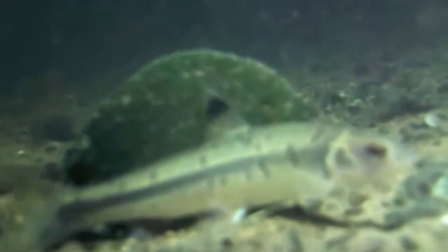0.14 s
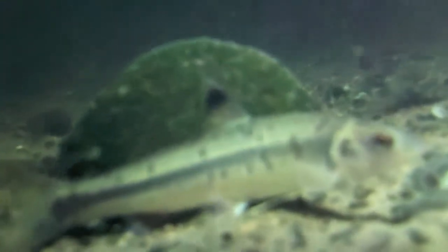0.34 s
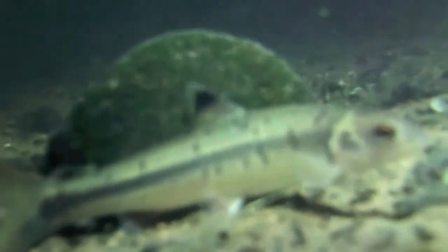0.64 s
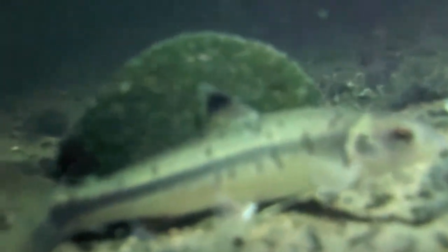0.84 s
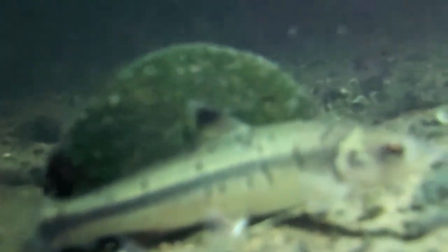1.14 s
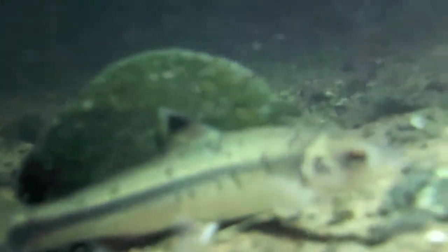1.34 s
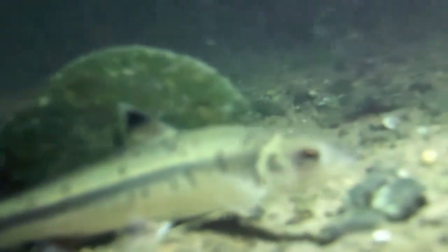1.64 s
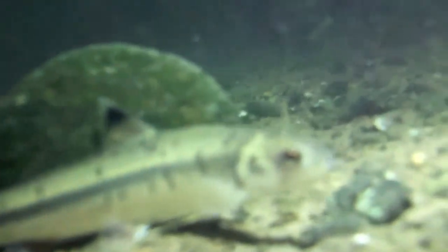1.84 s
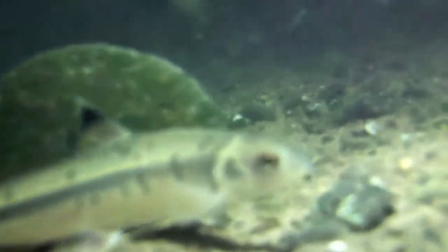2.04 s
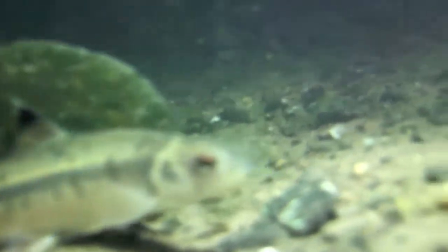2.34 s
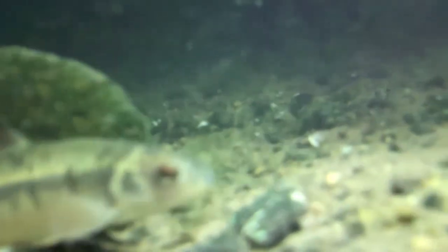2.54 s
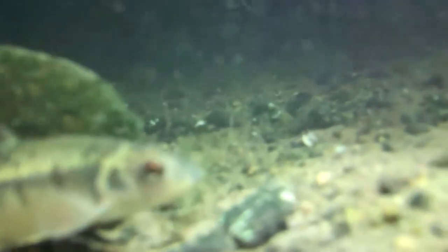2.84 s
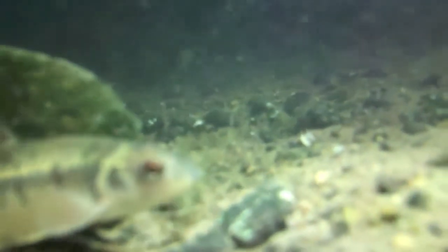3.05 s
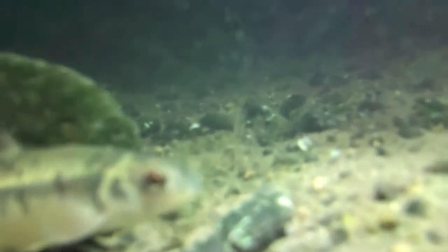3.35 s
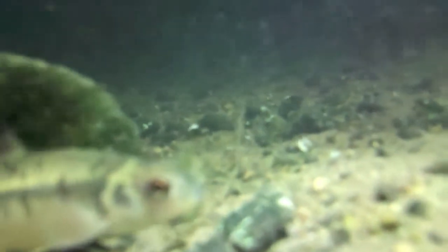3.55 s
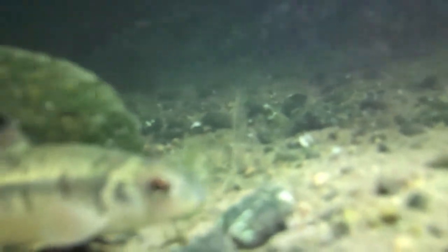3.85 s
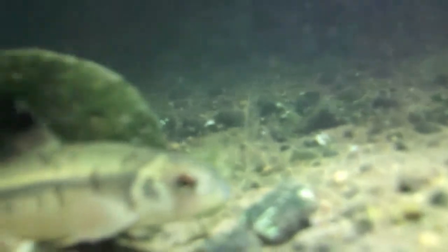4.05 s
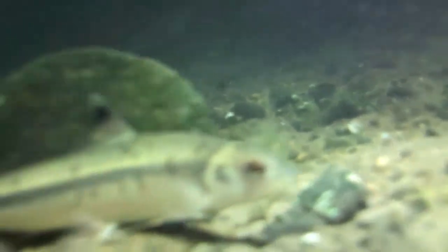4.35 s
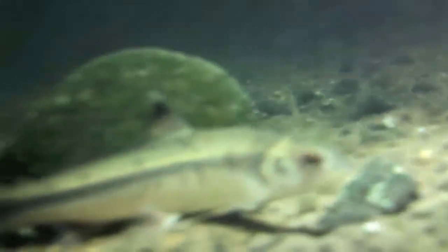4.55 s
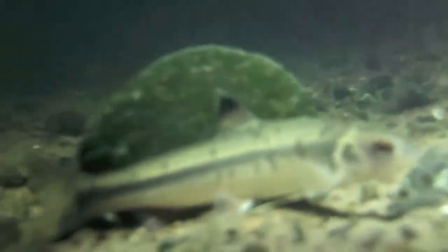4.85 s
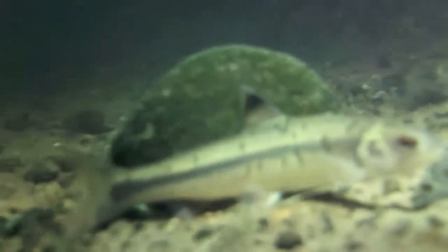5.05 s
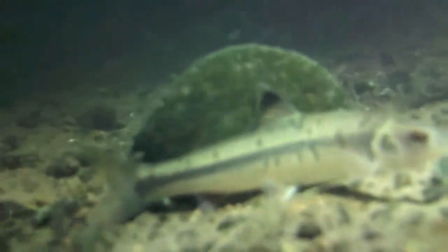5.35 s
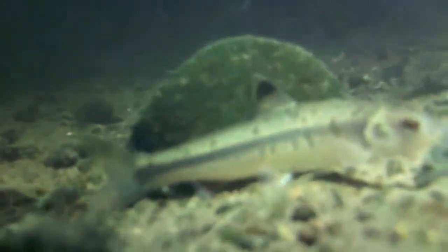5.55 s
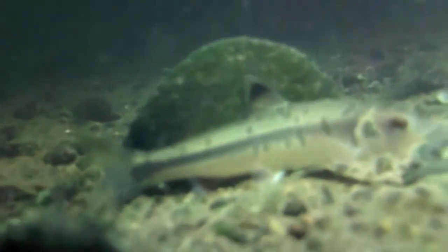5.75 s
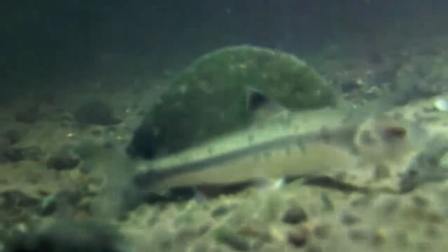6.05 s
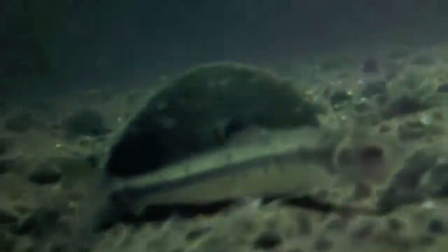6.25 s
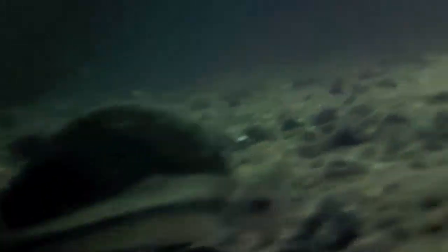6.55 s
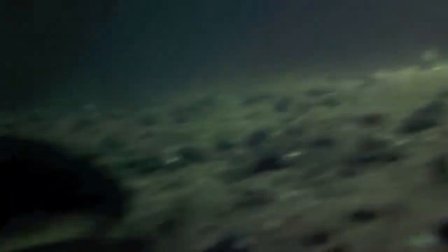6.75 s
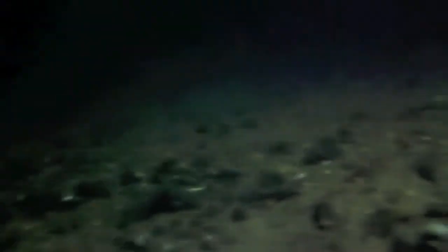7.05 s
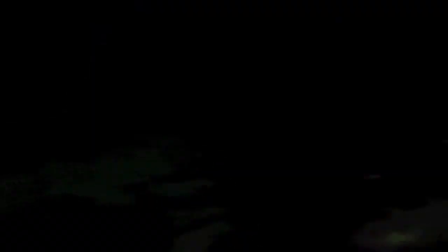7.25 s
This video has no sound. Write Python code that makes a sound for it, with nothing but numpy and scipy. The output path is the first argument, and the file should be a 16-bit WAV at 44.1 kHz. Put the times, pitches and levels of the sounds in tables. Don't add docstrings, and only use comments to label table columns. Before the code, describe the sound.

Heard from inside a sealed underwater housing, a canal current makes a low, lurching rumble. Muffled hollow knocks come often in the first two and a half seconds, thin out in the middle, then return more strongly from about six seconds to the end. Very faint hiss, a thin steady high whine and rare tiny ticks lie above.

```python
import sys
import numpy as np
from scipy import signal
from scipy.fft import rfft, irfft
from scipy.io import wavfile
from scipy.ndimage import uniform_filter1d, minimum_filter1d

SR = 44100
rng = np.random.default_rng(int(sys.argv[2]) if len(sys.argv) > 2 else 0)


def voltage_ratio(level):
    return 10 ** (np.asarray(level, float) / 20)


def to_wav(sig):
    pcm = np.clip(np.atleast_2d(sig), -1, 1) * 32767
    pcm = np.round(pcm).astype(np.int16)
    wavfile.write(sys.argv[1], SR, pcm.T)


N = 325899

# f/Hz, width/Hz, lowest f/Hz, highest f/Hz
ROCK_MODES = [
    (30.2, 29, 2, 46),
    (60.81, 4.9, 49.3, 140),
    (79.03, 12, 49, 110),
]
# t/s, level/dB
FLOW = [(0, -2), (.37, 2), (.75, -3), (1.3, 1.5), (1.7, -1), (2.3, 0.5), (2.6, 1), (3.6, 1.5), (4.2, 1),
        (4.8, 3), (5.4, 0.5), (5.95, 1), (6.25, -6.5), (6.7, 3.5), (7.1, 2.5), (7.39, 0)]
# t/s, peak level/dB, length/s
HEAVES = [(-0, -28, 0.028), (0.562, -44.5, 0.22), (1.029, -45, 0.11), (1.328, -42.5, 0.2),
          (1.586, -46.5, 0.075), (2.35, -45, 0.19), (3.76, -51, 0.19), (4.203, -47, 0.096),
          (4.66, -37.5, 0.18), (5.823, -46, 0.16), (6.524, -45, 0.056), (7.087, -39, 0.062),
          (7.266, -36, 0.099)]
# t/s, peak level/dB, length/s
SWAYS = [(0.059, -40, 0.071), (0.25, -43, 0.1), (0.519, -38, 0.38), (0.763, -40.5, 0.18),
         (1.058, -40.5, 0.2), (1.385, -37.5, 0.06), (1.501, -44, 0.053), (1.74, -45.5, 0.097),
         (1.922, -39.5, 0.14), (2.434, -42.5, 0.086), (2.992, -42.5, 0.063), (3.483, -50, 0.053),
         (3.879, -43, 0.19), (4.132, -36.5, 0.05), (4.31, -42, 0.084), (4.578, -39.5, 0.06),
         (4.703, -41.5, 0.16), (4.917, -39, 0.095), (5.13, -41.5, 0.22), (5.51, -42, 0.08),
         (5.762, -37.5, 0.044), (5.931, -38.0, 0.095), (6.03, -43, 0.047), (6.151, -36.5, 0.093),
         (6.513, -43.5, 0.16), (6.704, -34, 0.081), (6.823, -41.5, 0.08), (6.967, -38, 0.08),
         (7.11, -43.5, 0.046), (7.328, -45.5, 0.12)]
# t/s, peak level/dB, length/s
NODS = [(0.083, -39, 0.081), (0.238, -30, 0.06), (0.334, -33.5, 0.064), (0.502, -33.5, 0.041),
        (0.658, -36, 0.043), (0.739, -39.5, 0.059), (1.017, -36, 0.025), (1.06, -40.5, 0.089),
        (1.382, -40, 0.028), (1.489, -34.5, 0.031), (1.725, -33.5, 0.028), (1.865, -36, 0.03),
        (1.91, -35.5, 0.055), (2.175, -45, 0.066), (2.292, -35, 0.043), (2.383, -36.1, 0.035),
        (2.956, -40, 0.041), (3.478, -37, 0.033), (3.71, -41, 0.05), (4.562, -44.5, 0.037),
        (4.697, -35, 0.04), (4.871, -34, 0.15), (5.136, -35, 0.031), (5.901, -38, 0.035),
        (6.012, -29.5, 0.049), (6.176, -38, 0.023), (6.719, -37, 0.048), (6.81, -37.5, 0.033),
        (6.897, -42, 0.028), (7.287, -41, 0.031)]
CALM_DB = [-52, -56.5, -57.5]
CALM_FLOW = [.5, 0.61, 0.99]
CALM_RATE_HZ = [8.7, 8.1, 13]
CALM_SPREAD_DB = [2, 4.0, 4.5]
RISE_SHARE = 0.98

# f/Hz, level/dB, t60/s
SHELL = [(113.3, 1.5, 0.17), (200.4, -0.5, 0.059), (251, 0, 0.11), (330.4, -5.5, 0.082),
         (417.4, -15, 0.097), (516.4, -18.5, 0.049), (651, -32, 0.03), (770, -37, 0.033),
         (1016, -39, 0.044)]
# t/s, peak level/dB, upper modes/dB, edge/dB, struck region f/Hz
SHARP_KNOCKS = [(0.326, -35, -11, -44, 253), (0.485, -32, -11.5, -39, 193), (0.493, -34, -13, -25.5, 239),
                (1.003, -38, -8, -32, 323), (1.362, -39, -18.5, -40, 317), (1.469, -37, -14.5, -52, 305),
                (1.705, -32, -13, -26, 325), (1.958, -48.5, -8.5, -38, 289), (2.274, -41, -13, -34, 242),
                (2.363, -37, -14, -33.5, 191), (5.17, -36.5, -18, -48, 189), (6.002, -28.5, -19, -50, 191),
                (6.367, -38, -13, -24, 256), (6.865, -28.5, -20.5, -44.5, 249),
                (7.243, -44.5, -12, -42, 189), (7.295, -27.5, -11, -15, 233)]
# t/s, peak level/dB, struck region f/Hz
DULL_KNOCKS = [(0.053, -37.5, 249), (0.177, -38, 248), (0.394, -40.5, 250), (0.965, -44.5, 248),
               (1.042, -33, 185), (1.191, -47.5, 240), (1.57, -45.5, 248), (2.385, -34, 250),
               (3.462, -43.5, 248), (3.709, -42.5, 250), (3.811, -39, 247), (4.107, -43.5, 270),
               (4.742, -51, 188), (5.759, -47.5, 244), (6.222, -41, 248), (6.46, -35.5, 224),
               (6.534, -39.5, 235), (6.634, -43.5, 237)]
DULL_UPPER_DB, DULL_EDGE_DB = -27, -42.5
THUMP_HZ, THUMP_T60_S, THUMP_DB = 88.8, 0.13, -7
CONTACT_CYCLES = .7

# t/s, peak level/dB, rise/s
RINGS = [(.345, -49.5, 0.025), (.46, -53.5, 0.045), (1.025, -48, .02), (1.49, -48, 0.031),
         (1.725, -45, 0.018), (2.39, -56.5, 0.057), (4.56, -50, 0.14), (4.78, -54, 0.036),
         (4.99, -53.5, .05), (5.19, -56, 0.051), (6.025, -47.5, 0.028), (6.52, -50, 0.073),
         (6.72, -54, 0.11), (7.1, -59, 0.11)]
RING_HZ, RING_T60_S = 156, 0.39
RING_FALL_DB_S, RING_CALM_DB, SHELL_DB = 90.5, -69, -60.5

# t/s, step level/dB, sign, chatter on a held crest/ms, corner
# level/dB
TICKS = [
    (0, -43, 1, 0, -99),
    (.4941, -59, -1, .4, -53),
    (.5001, -57, 1, .5, -51),
    (1.0574, -60, -1, 0, -99),
    (6.0120, -59, -1, 1.4, -47),
    (6.0249, -61, -1, .9, -54),
    (6.5607, -62, -1, 0, -99),
    (6.6887, -60, 1, 0, -99),
    (7.2982, -57, 1, 1.0, -41),
    (7.3003, -56, -1, .7, -40),
]
CHATTER_HZ = 3500
# t/s, level/dB
GAIN = [(0, -0.5), (.493, 1.5), (.494, -1.5), (1.05, -0.5), (1.7, 1.5), (6.011, 1.5), (6.012, 13.5),
        (6.024, -12), (6.025, -3.5), (6.55, -3), (6.75, -0.5), (7.297, -0.5), (7.302, -14.5), (7.39, -7.5)]
# f/Hz, level/dB
HISS = [(400, -26.5), (700, 3), (1100, 5.5), (2000, 0.5), (4000, -1), (7000, -1.5), (14400, -2),
        (14600, -14), (15700, -20)]
HISS_DB = -94
WHINE_HZ, WHINE_DB = 7867.13, -87
FIELD_HZ, FIRST_FLIP_S = 60.045, .0123
WARM = SR // 2


def rocking():
    out = 0
    flow_db, = curves(FLOW)
    for k, eddies in enumerate((HEAVES, SWAYS, NODS)):
        hz, width_hz, low_hz, high_hz = ROCK_MODES[k]
        swing = driven(hz, np.log(1000) / (np.pi * width_hz * 1.9), order=3)
        wander_db = CALM_SPREAD_DB[k] * walk(CALM_RATE_HZ[k])
        calm_db = CALM_DB[k] + CALM_FLOW[k] * flow_db + wander_db
        pushed = surges(eddies, calm_db) * evened(swing, hold_s=0.0071, share=1)
        out = out + between(pushed, low_hz, high_hz)
    return out


def knocks():
    span = SR // 2
    out = np.zeros(N + SR)
    dull = [(s, db, DULL_UPPER_DB, DULL_EDGE_DB, hz) for s, db, hz in DULL_KNOCKS]
    blows = sorted(list(SHARP_KNOCKS) + dull)
    chance = rng.standard_normal((len(blows), len(SHELL)))
    push = np.zeros(span)
    contact = np.blackman(int(0.0014 * SR))
    push[:len(contact)] = contact / contact.sum()

    rings = []
    for hz, _, t60 in SHELL[:-1]:
        soft = np.hanning(int(CONTACT_CYCLES * SR / hz)) * hz / SR
        rings.append(swelling(signal.lfilter(soft, [1], push), hz, 0.53 * t60))
    body_ring = mode(push, RING_HZ, RING_T60_S).imag
    thump = swelling(push, THUMP_HZ, THUMP_T60_S)

    for (s, db, upper_db, edge_db, struck_hz), spread in zip(blows, chance):
        shell = 0
        for (hz, mode_db, _), ring, c in zip(SHELL, rings, spread):
            if hz > 370:
                ring_db = 0.77 * mode_db + (upper_db + 11.0 if hz < 580 else edge_db + 32.5)
            else:
                ring_db = -10.5 * abs(np.log2(hz / struck_hz))
            delay = int(SR * (.8 + .4 * abs(c)) / min(hz, 320))
            shell = shell + np.sign(c) * voltage_ratio(ring_db) * np.roll(ring, delay)
        blow = shell / np.abs(shell).max() + voltage_ratio(-23.5) * body_ring - voltage_ratio(THUMP_DB) * thump
        start = int((s - .0045) * SR)
        out[start:start + span] += voltage_ratio(db - 1.0) * blow
    return out[:N]


def drumming():
    flow_db, = curves(FLOW)
    ring = evened(driven(RING_HZ, RING_T60_S / 2, order=2), hold_s=.03, share=1)
    gust_db = 0.69 * walk(7.5)
    shell = 0
    for hz, db, t60 in SHELL:
        murmur = level(driven(hz, 0.49 * t60, order=2).real, db)
        shell = shell + murmur * voltage_ratio(gust_db + 2.0 * walk(14))
    ring_swell = surges(RINGS, RING_CALM_DB + 3.5 * walk(15), RING_FALL_DB_S)
    return ring_swell * ring + voltage_ratio(SHELL_DB + flow_db) * level(shell, 3.3)


def ticks():
    steps, corners = np.zeros(N), np.zeros(N)
    near = np.arange(-60, 61)
    for s, db, sign, chatter_ms, corner_db in TICKS:
        times = s + np.arange(0, chatter_ms / 1000 + 1e-5, 1 / CHATTER_HZ)
        times[1:] += rng.uniform(-.3, .3, len(times) - 1) / CHATTER_HZ
        steps[(times * SR).astype(int)] = sign * voltage_ratio(db + 2.5)
        if chatter_ms:
            hold = slice(int(s * SR), int(times[-1] * SR) + 8)
            steps[hold] -= steps[hold].mean()
        corners[int(s * SR) + near] -= sign * voltage_ratio(corner_db + 1.5) * np.exp(-np.abs(near) / 10)
    sagging = signal.lfilter([1], [1, -np.exp(-1 / (.004 * SR))], steps)
    return corners + sagging


def electronics():
    hz, db = np.transpose(HISS)
    freq = np.fft.rfftfreq(N, 1 / SR)
    colour = rfft(rng.standard_normal(N)) * voltage_ratio(np.interp(np.log(freq + 1), np.log(hz), db))
    treble_rms = irfft(colour * ((freq > 9000) & (freq < 14000)), N).std()
    hiss = irfft(colour, N) * voltage_ratio(HISS_DB) / treble_rms
    t = np.arange(N) / SR
    flip = np.tanh(14 * np.sin(np.pi * FIELD_HZ * (t - FIRST_FLIP_S)))
    whine = flip * np.sin(2 * np.pi * WHINE_HZ * t)
    return hiss + level(whine, WHINE_DB)


def level(x, db):
    return x * voltage_ratio(db) / np.sqrt(np.mean(x ** 2))


def curves(table):
    s, *columns = np.transpose(table)
    return [np.interp(np.arange(N) / SR, s, c) for c in columns]


def mode(x, hz, t60):
    pole = np.exp(2j * np.pi * hz / SR - np.log(1000) / (t60 * SR))
    return signal.lfilter([1], [1, -pole], x)


def swelling(x, hz, t60):
    ring = mode(mode(x, hz, t60), hz, 0.43 * t60).imag
    return ring * np.log(1000) / (0.17 * t60 * SR)


def driven(hz, t60, order):
    z = rng.standard_normal(N + WARM)
    for _ in range(order):
        z = mode(z, hz, t60)
    return z[WARM:]


def evened(z, hold_s, share):
    slow_power = uniform_filter1d(np.abs(z) ** 2, int(hold_s * SR))
    return level(z.real / slow_power ** (np.clip(share, 0, 1) / 2), 0)


def walk(rate_hz):
    k = int(SR / rate_hz)
    held = np.repeat(rng.standard_normal(N // k + 1), k)
    return 1.7 * uniform_filter1d(uniform_filter1d(held, k), k)[:N]


def between(x, low_hz, high_hz):
    band = signal.butter(2, [low_hz, high_hz], "band", fs=SR, output="sos")
    return signal.sosfiltfilt(band, x)


def surges(table, calm_db, fall_db_s=None):
    t = np.arange(0, N + 64, 64) / SR
    power = 0
    for s, db, length in table:
        side = length * np.where(t < s, RISE_SHARE, 2 - RISE_SHARE)
        down_db = 24 * ((t - s) / side) ** 2
        if fall_db_s:
            down_db = np.where(t > s, fall_db_s * (t - s), down_db / 4)
        power = power + voltage_ratio(db - down_db) ** 2
    return np.sqrt(voltage_ratio(calm_db) ** 2 + np.interp(np.arange(N) / SR, t, power))


def scene():
    gain_db, = curves(GAIN)
    water = rocking() + drumming() + knocks()
    top = np.interp(np.arange(N) / SR, [.01, .04], [.019, .054])
    ahead = SR // 80
    ease = minimum_filter1d(np.minimum(1, top / (np.abs(water) + 1e-9)), 2 * ahead)
    ease = uniform_filter1d(uniform_filter1d(ease, ahead), ahead)
    return (ease * water + ticks() + voltage_ratio(gain_db) * electronics())[None]


def low_pass(x):
    return signal.sosfilt(signal.butter(12, 15740, fs=SR, output="sos"), x)


def record(dry):
    fade = np.sin(np.pi / 2 * np.clip((N - np.arange(N)) / (.006 * SR), 0, 1)) ** 2
    return low_pass(fade * dry)


dry = scene()
out = record(dry)
to_wav(out)
```